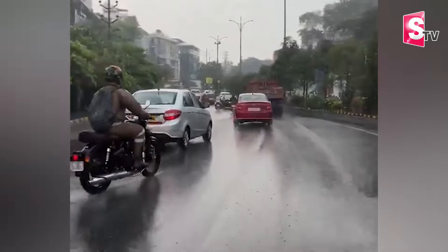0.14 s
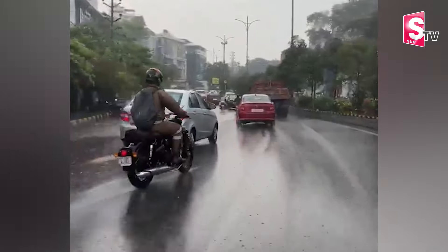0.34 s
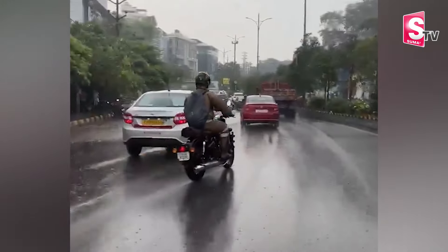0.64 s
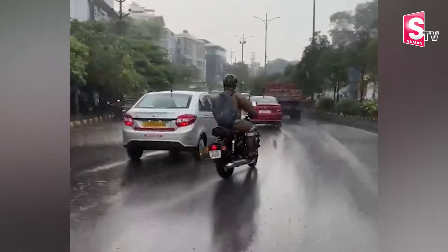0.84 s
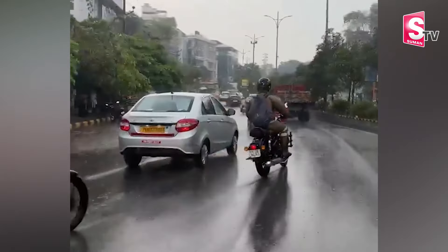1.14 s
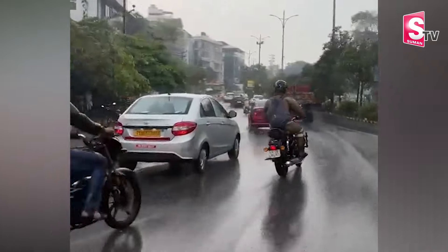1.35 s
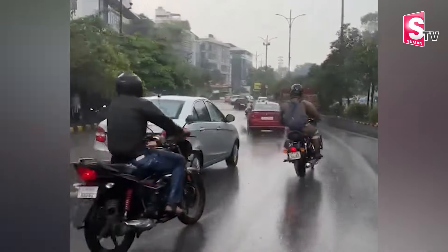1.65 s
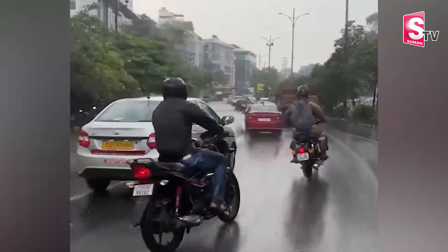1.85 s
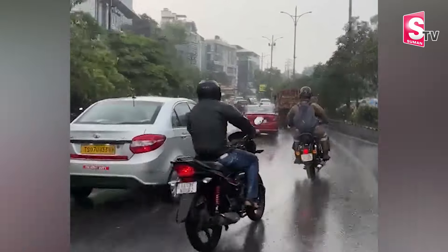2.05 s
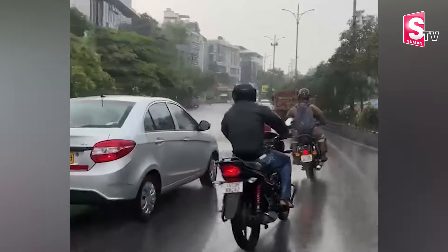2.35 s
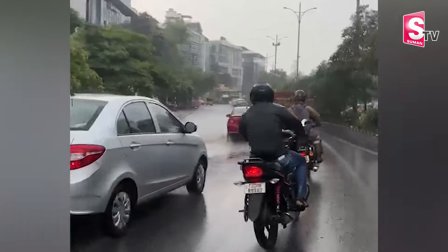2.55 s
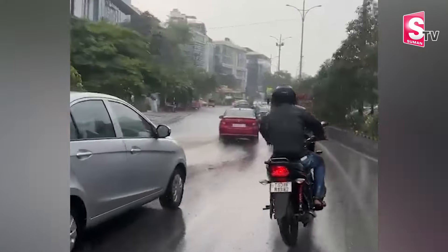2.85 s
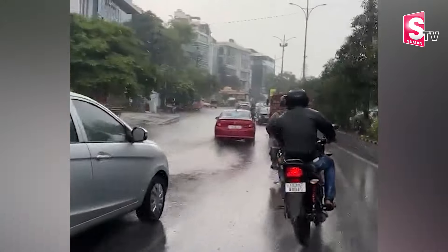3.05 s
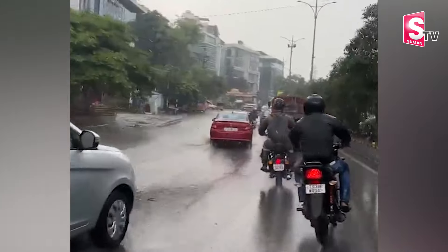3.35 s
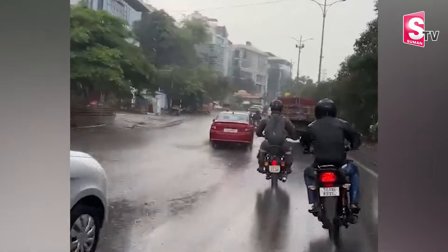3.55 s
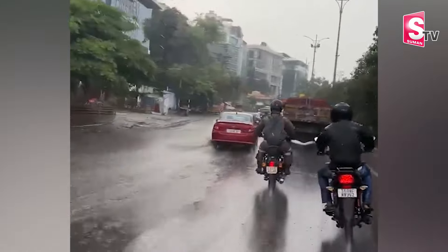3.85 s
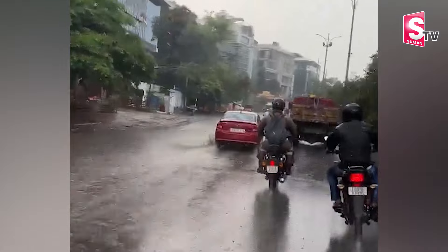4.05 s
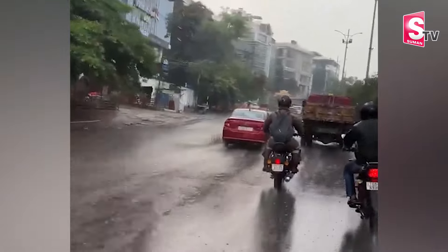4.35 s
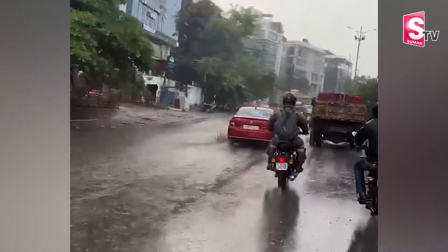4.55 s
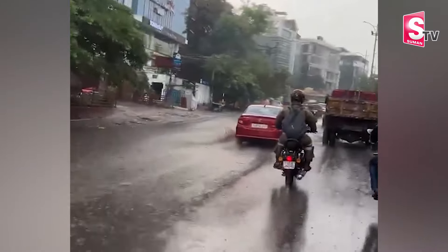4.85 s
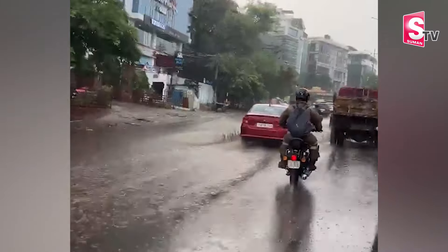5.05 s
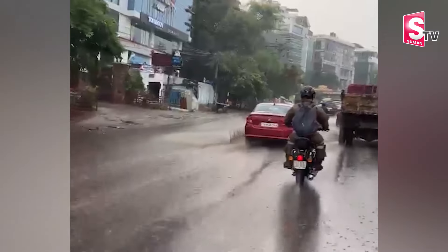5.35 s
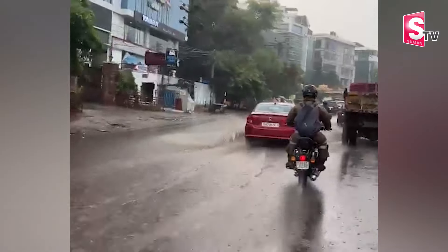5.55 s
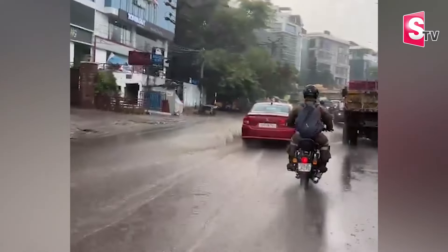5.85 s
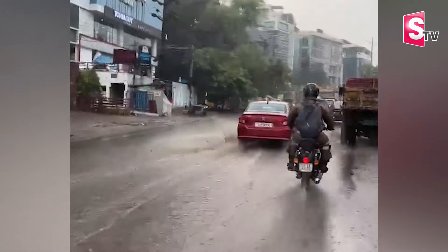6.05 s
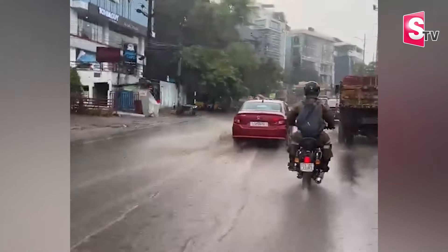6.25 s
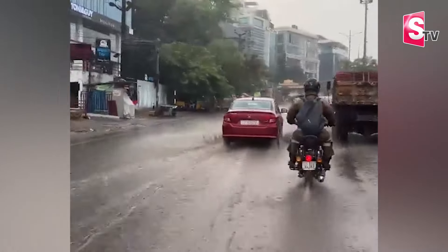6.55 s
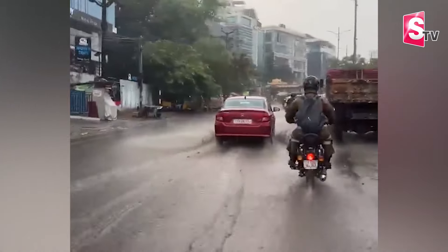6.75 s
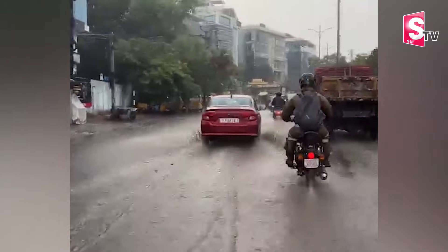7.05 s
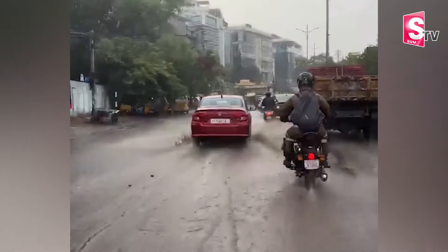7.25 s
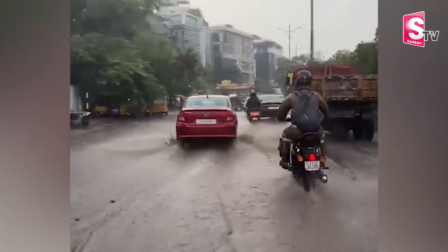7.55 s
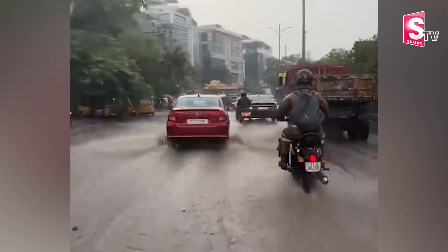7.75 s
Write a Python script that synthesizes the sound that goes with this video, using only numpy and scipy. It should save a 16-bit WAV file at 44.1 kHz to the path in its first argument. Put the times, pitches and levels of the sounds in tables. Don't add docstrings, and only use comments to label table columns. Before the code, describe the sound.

A rainy city road heard from a moving two-wheeler through a phone's stereo microphones. The sound fades in over the first 0.7 seconds: a wide, grainy hiss of rain and tyre spray, dull above the upper treble, gently swelling throughout, brighter near 0.7 and 5 seconds. Until about 3.4 seconds, close wind rumbles, thumps and flutters in uneven bursts, some swinging between left and right, over a faint low engine hum. Soft pops occur, with a sharp snap at 1.65 and duller ones near 3.0, 3.8 and 3.9. Then head wind eases to scattered puffs; sideways buffets swell near 4.7 and 5.0 while faint engine tones rise between 4.3 and 5.6. A soft knock comes at 6.0. At 6.3-6.45 a violent, overloaded slam of air booms with clustered pops. Wind falls away, leaving mostly wet hiss, with puffs near 6.7 and 7.3. At 7.84 a fat drop strikes the case with a short hollow tock.

```python
import sys
import numpy as np
from scipy import signal
from scipy.fft import rfft, irfft, next_fast_len
from scipy.io import wavfile
from scipy.ndimage import uniform_filter1d

SR = 44100
rng = np.random.default_rng(int(sys.argv[2]) if len(sys.argv) > 2 else 0)


def gain_from_db(level_db):
    decades = np.asarray(level_db, float) / 20
    return 10 ** decades


def inscribe(sig):
    pcm = np.round(np.clip(np.atleast_2d(sig).T, -1, 1) * 32767)
    wavfile.write(sys.argv[1], SR, pcm.astype(np.int16))


N = 348698


def evened(x):
    return x / np.sqrt(np.mean(x ** 2) + 1e-20)


def wander(shape, spans):
    x = rng.standard_normal(shape)
    for axis, span in enumerate(spans):
        x = uniform_filter1d(x, size=span, axis=axis)
    return evened(x)


def along(rows):
    s, *columns = np.transpose(rows)
    return [np.interp(np.arange(N) / SR, s, c) for c in columns]


def swells(rows):
    s, length, *columns = np.transpose(rows)
    t = np.arange(0, N + 64, 64) / SR
    bells = np.exp(-4 * np.log(2) * ((t[:, None] - s) / length) ** 2)
    return [np.interp(np.arange(N) / SR, t, bells @ c) for c in columns]


def coloured(x, points, smear_s=0, below_hz=300):
    size = next_fast_len(N + 8192)
    hz = np.fft.rfftfreq(size, 1 / SR)
    f, db = np.transpose(points)
    gain = gain_from_db(np.interp(np.log(hz + 1), np.log(f), db, -90, -90))
    late_turns = np.cumsum(smear_s / (1 + (hz / below_hz) ** 2)) * hz[1]
    spectrum = rfft(x, size) * gain * np.exp(-2j * np.pi * late_turns)
    return evened(irfft(spectrum, size)[..., :N])


def clicks(per_s, spread_db):
    size = gain_from_db(spread_db * np.minimum(rng.exponential(1, N), 5))
    sign = rng.choice([-1, 1], N)
    return evened(size * sign * (rng.random(N) < per_s / SR))


def add(mix, s, sound):
    part = mix[:, round(s * SR):][:, :sound.shape[1]]
    part += sound[:, :part.shape[1]]


# f/Hz, level/dB per Hz
HISS = [(60, -10), (200, -1.5), (500, -2), (1200, -1.5), (1600, -2.5), (2050, -6), (2600, -3.5), (3300, -8),
        (5000, -7.5), (6200, -11.5), (9000, -14.5), (11000, -14), (11800, -16.5), (12100, -50)]
# f/Hz, likeness/0-1, left lead/rad, left minus right/dB
PORTS = [(300, 0.16, -0.5, 2.5), (700, 0.53, -0.5, -1.5), (1100, 0.59, -0.97, -1.5),
         (1600, 0.77, -0.02, -1), (2310, 0.47, 0.8, -1), (2760, 0.31, 3, -3), (3740, 0.4, 1.76, -2),
         (5070, 0.17, 2.5, 0), (5224, 1, 2.5, -7.5), (6073, .97, 4, 2.5), (7320, 0.86, 6, -4),
         (9247, 1, 8.5, 2.5), (10206, 1, 9.5, -4.5), (11720, 1, 11.5, 2.5)]
# t/s, length/s, fizz gain/dB, hiss gain/dB
SPRAYS = [(.7, 1.08, 4.5, -0.55), (1.45, 0.76, 2, 1), (2.2, 0.42, 0, 0.3), (2.8, 0.6, 1, .1),
          (3.7, 0.46, 0.5, 0.5), (4.2, 0.17, 1.5, 0.6), (4.5, 0.33, 3.5, -0.3), (4.9, 0.19, 4.5, -.3),
          (5.25, .6, 2.5, -0.26), (6.4, 0.7, 1, -0.2), (6.85, 1.3, -0.8, 1), (7.6, 0.55, .1, .6)]


def rain(rain_db=-26.5, patchy_db=1.0, flicker_db=0.46, drops=0.42, fizz_hz=5500):
    spray_fizz_db, spray_hiss_db = swells(SPRAYS)
    near_drops = np.array([clicks(1500, 3.16), clicks(1500, 4.4)])
    source = rng.standard_normal((2, N)) + drops * near_drops
    hz, t, z = signal.stft(coloured(source, HISS), SR, nperseg=512, noverlap=384)

    patches = wander(z.shape[1:], [8, 12])
    flicker = wander([len(t)], [6])
    fizz_db = np.interp(t * SR, np.arange(N), spray_fizz_db)
    treble = np.clip(np.log2(hz / fizz_hz + 1e-9) + 1, 0, 1)
    tilt_db = np.outer(treble, fizz_db - np.median(fizz_db))

    f, *columns = np.transpose(PORTS)
    same, lead, balance_db = (np.interp(hz, f, c)[:, None] for c in columns)
    same = np.clip(same, 0, 1)
    left = z[0] * gain_from_db(balance_db / 2)
    right = (same * z[0] + np.sqrt(1 - same ** 2) * z[1]) * np.exp(-1j * lead) / gain_from_db(balance_db / 2)
    pair = np.array([left, right]) * gain_from_db(patchy_db * patches + flicker_db * flicker + tilt_db)
    wash = signal.istft(pair, SR, nperseg=512, noverlap=384)[1][:, :N]
    return gain_from_db(rain_db + spray_hiss_db) * evened(wash)


def buffet(thump_db, flutter_db, thump, flutter, eddies, per_s):
    drive = (1 - eddies) * rng.standard_normal(N) + eddies * clicks(per_s, 3.58)
    low = coloured(drive, thump, smear_s=0.01174, below_hz=243)
    high = coloured(drive, flutter, smear_s=0.01206, below_hz=247)
    return gain_from_db(thump_db) * low + gain_from_db(flutter_db) * high


# t/s, thump level/dB
WIND = [(0, -16.5), (.5, -19), (1.4, -18.5), (2.0, -17), (3.36, -16.5), (3.42, -29), (4.2, -29), (4.6, -25),
        (5.4, -27), (6.1, -28.5), (6.23, -15.5), (6.33, -14), (6.385, -2.5), (6.48, -17), (6.6, -18),
        (6.76, -29), (7.16, -34), (7.8, -25.5)]
# t/s, length/s, level/dB
GUSTS = [(.45, .04, -6), (.74, 0.049, 1.5), (.92, 0.17, 0), (1.35, .07, 1), (1.42, 0.067, -5),
         (1.52, 0.04, 3), (1.98, 0.041, 4.5), (2.05, .1, -2.5), (2.2, 0.021, -15), (2.27, 0.085, 5),
         (2.33, 0.086, -8), (2.44, 0.064, 3), (2.55, .04, 3), (2.6, .04, -7), (2.71, .03, -3),
         (2.77, 0.057, 1.5), (2.85, 0.083, -15), (2.96, 0.044, 4.5), (3.36, 0.033, 4), (3.5, 0.055, 6),
         (3.59, 0.063, 4.5), (3.65, .05, -6), (3.88, .08, 7), (4.12, .04, 10.5), (4.82, 0.058, -6),
         (5.04, 0.07, 4), (5.11, .06, -7), (5.5, 0.11, -5), (6.67, .1, 11), (7.31, 0.079, 16)]
# t/s, length/s, level/dB
FLAPS = [(.44, .1, 4), (1.44, 0.085, -4.5), (1.93, 0.047, 4), (2.2, 0.024, -9), (2.51, .07, -3.5),
         (2.61, 0.028, -8), (2.685, .04, 2.5), (2.72, .03, -9), (2.84, 0.073, -3), (3.02, 0.048, 4.5),
         (3.1, 0.095, -8), (3.47, .07, 11.5), (3.58, .06, 1.5), (3.65, 0.053, -3), (3.9, 0.032, 9),
         (3.97, 0.11, -7), (4.12, 0.072, -10), (4.62, .06, -5), (5.37, 0.05, 6.5), (5.15, .3, 2),
         (5.75, .3, 1), (5.98, 0.063, 6.5), (6.27, 0.17, -3.5), (6.345, 0.035, 5), (6.41, 0.09, 5.5),
         (6.6, 0.24, 1.5), (6.9, 0.44, -4.5), (7.75, 0.24, 2.5)]
# f/Hz, level/dB per Hz
THUMP = [(18, -35), (45, -4.5), (74, 2.5), (110, 0), (165, -9), (230, -43.5), (300, -43)]
# f/Hz, level/dB per Hz
FLUTTER = [(110, -18.5), (170, -3.5), (250, -0.5), (360, -7), (500, -13.5), (800, -25), (1300, -39)]
# t/s, thump level/dB
CROSSWIND = [(0, -29), (.4, -34.5), (.75, -31), (1.4, -21.5), (1.75, -21.5), (2.3, -25), (2.7, -18),
             (3.0, -22.5), (3.45, -23), (3.62, -31.5), (4.1, -40), (5.5, -34.5), (5.95, -32.5),
             (6.3, -28.5), (6.55, -28.5), (6.76, -40), (6.87, -66), (7.4, -38)]
# t/s, length/s, thump gain/dB, flutter over that/dB
SWIRLS = [(.72, 0.14, 6, -4), (.97, 0.12, 5.5, 2), (1.16, 0.2, -5, -5), (1.73, .12, 3.5, -1.5),
          (2.2, 0.19, 2.5, 5), (2.35, 0.15, -2.5, -3.5), (2.86, 0.16, -4, -3), (3.23, 0.13, -2, -8),
          (3.36, 0.13, 3.5, 1), (3.48, .12, -2, 6), (3.8, .25, 0.5, 8), (4.1, 0.11, 4, 3),
          (4.35, 0.13, 3, 8), (4.66, 0.2, 18, -2), (5.04, 0.16, 12, 1.5), (5.35, 0.092, 3, .5),
          (5.47, 0.11, -9, 11), (5.6, 0.1, 1, 3), (5.9, 0.38, 2, 7), (6.16, 0.076, 4, -2),
          (6.38, .14, 8.5, -1), (6.55, .1, -4, -4), (7.1, .13, 6, .5), (7.22, .12, -14, -6)]
# f/Hz, level/dB per Hz
CROSS_THUMP = [(18, -12), (60, -5), (120, 0.5), (220, -5), (320, -37), (450, -60)]
# f/Hz, level/dB per Hz
CROSS_FLUTTER = [(160, -39), (250, -2.5), (360, -3), (480, -5.5), (600, -9), (1100, -20), (1600, -38)]


def wind():
    (head_db,), (gust_db,), (flap_db,) = along(WIND), swells(GUSTS), swells(FLAPS)
    flutter_db = -27.5 + 0.4 * (head_db + 20) + flap_db
    common = buffet(head_db + gust_db, flutter_db, THUMP, FLUTTER, eddies=0.55, per_s=300)

    (cross_db,), (swirl_db, swirl_flutter_db) = along(CROSSWIND), swells(SWIRLS)
    cross_db = cross_db + swirl_db
    cross_flutter_db = cross_db - 3.5 + swirl_flutter_db
    cross = buffet(cross_db, cross_flutter_db, CROSS_THUMP, CROSS_FLUTTER, eddies=0.51, per_s=300)
    return gain_from_db(-1.46) * common + np.outer([1, -1], gain_from_db(-0.32) * cross)


# t/s, peak level/dB, left minus right beyond a common 3.5 dB/dB
POPS = [(.436, -8.5, -8), (0.488, -20, 2), (2.667, -25, -1), (3.006, -11.5, 3.5), (3.76, -12.5, -3),
        (6.332, 2.5, 4), (6.35, -3.5, -1), (6.366, -14, 1), (6.396, -11, .5), (6.405, -1, 4),
        (6.426, -9, .5), (7.012, -14, 2)]
# t/s, peak level/dB, start f/Hz, end f/Hz, length/s
SHARP_POPS = [
    (1.6492, -8, 1600, 280, .011),
    (3.45, -25, 800, 250, 0.0075),
    (3.9, -13, 700, 200, 0.0127),
    (6.375, -1.5, 150, 75, 0.048),
    (6.412, -7, 200, 83.6, 0.041),
    (5.971, -15, 300, 240, 0.042),
]


def pops():
    out = np.zeros((2, N))
    usual = [(s, db, 850, 160, .016, pan_db) for s, db, pan_db in POPS]
    sharp = [(*row, -.6) for row in SHARP_POPS]
    for s, db, start_hz, end_hz, length, pan_db in usual + sharp:
        u = np.arange(round(length * SR)) / (length * SR)
        turns = np.cumsum(end_hz + (start_hz - end_hz) * np.exp(-7 * u)) / SR
        chirp = np.sin(2 * np.pi * turns) * np.sin(np.pi * u ** .52)
        levels = gain_from_db([db - 4.0 + pan_db / 2, db - 7.5 - pan_db / 2])
        add(out, s + 0.00236, np.outer(levels, chirp))
    return out


# start t/s, end t/s, start f/Hz, end f/Hz, level/dB
HUMS = [
    (4.28, 4.82, 122, 130, -28.5),
    (4.9, 5.42, 135, 140, -30),
    (5.3, 5.63, 398, 400, -40),
    (0.46, 3.34, 72, 75, -26),
]


def hums():
    out = np.zeros((2, N))
    for start, end, start_hz, end_hz, db in HUMS:
        count = round((end - start) * SR)
        drift, swell = (evened(uniform_filter1d(wander([N], [1500]), size=1500))[:count] for _ in "ab")
        hz = np.linspace(start_hz, end_hz, count) * (1 + 0.033 * drift)
        tone = np.sqrt(2) * np.sin(2 * np.pi * np.cumsum(hz) / SR) * signal.windows.tukey(count, .3)
        add(out, start, np.tile(gain_from_db(db + 3.3 * swell) * tone, (2, 1)))
    return out


# t/s, peak level/dB, start f/Hz, end f/Hz, length/s, tick level/dB
DROP = (7.8383, -2, 950, 660, .0062, -7)


def drop():
    s, db, start_hz, end_hz, length, tick_db = DROP
    out = np.zeros((2, N))
    t = np.arange(round(length * SR)) / SR
    turns = np.cumsum(end_hz + (start_hz - end_hz) * np.exp(-t / .002)) / SR
    ring = gain_from_db(db) * np.cos(2 * np.pi * turns + 4.6) * np.hanning(len(t))
    overtone = gain_from_db(db - 7) * np.sin(2 * np.pi * 1450 * t) * np.exp(-((t - .0026) / .001) ** 2)
    since_tick = t - .0022
    tick = gain_from_db(tick_db) * np.sin(2 * np.pi * 7000 * since_tick) * np.exp(-(since_tick / .00009) ** 2)
    add(out, s, np.outer(gain_from_db([-1.5, 1.2]), ring + overtone) + tick)
    return out


def scene():
    return rain() + wind() + pops() + hums() + drop()


# f/Hz, level/dB
DROPOUT = [(100, -35), (450, -20.5), (800, -10.5), (1600, -7.5), (3000, -8.5), (4500, -5.5), (5700, -2.5),
           (7000, -3), (8500, -3), (10500, -0.5), (11300, 0), (12000, 5)]
RETURNS = [
    3.305,
    4.65,
    7.845,
]


def joint_stereo(x, leak_db=-70, return_db=-4, block_db=1.1, band_db=1.5):
    window = signal.windows.kaiser_bessel_derived(2048, 4 * np.pi)
    shift = 1024 - 154
    pair = np.pad(np.array([x[0] + x[1], x[0] - x[1]]) / 2, ((0, 0), (shift, 2048)))
    hz, t, z = signal.stft(pair, SR, window, nperseg=2048, noverlap=1024)
    power = uniform_filter1d(abs(z) ** 2, size=4, axis=1)
    louder = uniform_filter1d(power.max(0), size=48, axis=0)

    f, db = np.transpose(DROPOUT)
    threshold_db = np.interp(np.log(hz + 1), np.log(f), db)[:, None]
    threshold_db = threshold_db + block_db * wander([len(t)], [2]) + band_db * wander(louder.shape, [14, 2])
    kept = power > louder * gain_from_db(2 * threshold_db)
    kept &= hz[:, None] < 11950
    reserve = wander([len(t)], [3])
    kept &= ~np.outer(hz > 10500, reserve < -1.3)

    sudden = np.min(abs(t[:, None] - shift / SR - RETURNS), 1) < 512 / SR
    z = z * np.where(kept, 1, gain_from_db(np.where(sudden, return_db, leak_db)))
    total, difference = signal.istft(z, SR, window, nperseg=2048, noverlap=1024)[1][:, shift:shift + N]
    return np.array([total + difference, total - difference])


def band_limit(x):
    return signal.sosfilt(signal.butter(12, 13420, fs=SR, output="sos"), x)


def record(dry):
    fade_s, ceiling = 0.7, 1.05
    faded = dry * np.clip(np.arange(N) / SR / fade_s + 0.0044, 0, 1) ** 0.98
    limited = np.tanh(faded / ceiling) * ceiling
    return band_limit(joint_stereo(limited))


dry = scene()
out = record(dry)
inscribe(out)
```